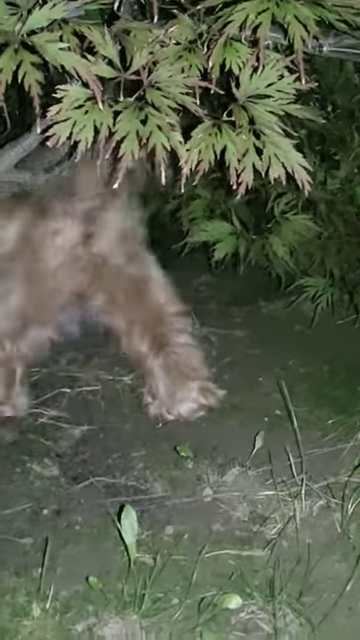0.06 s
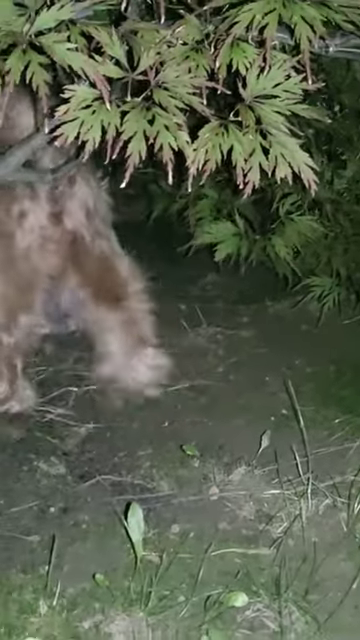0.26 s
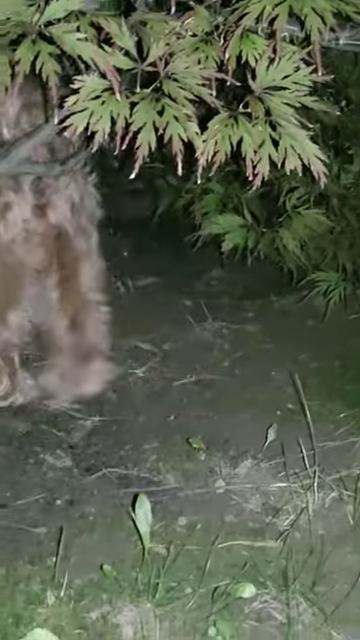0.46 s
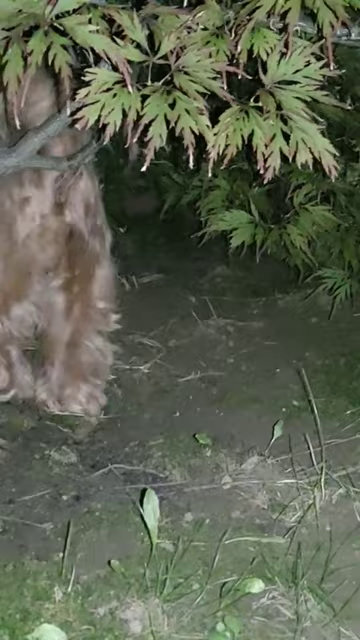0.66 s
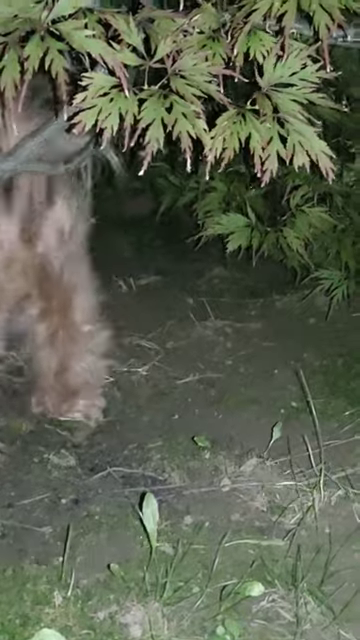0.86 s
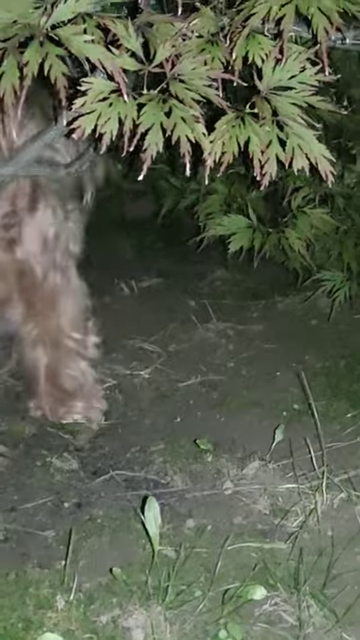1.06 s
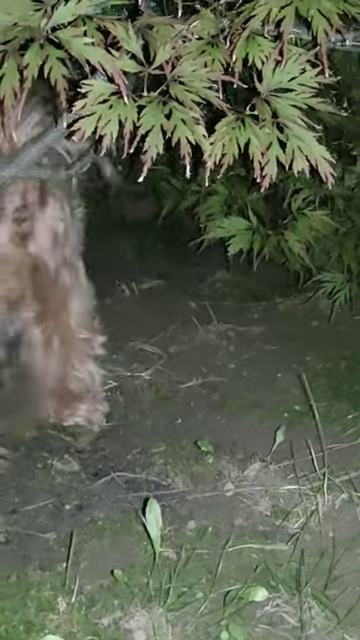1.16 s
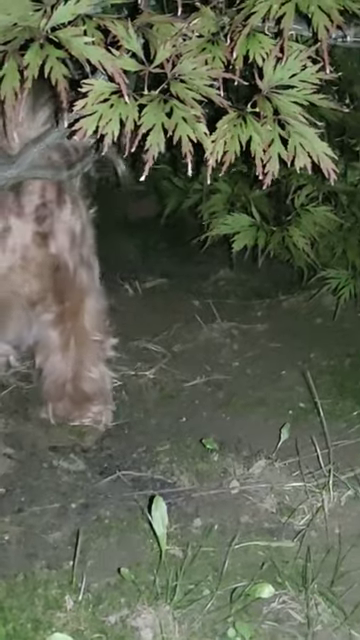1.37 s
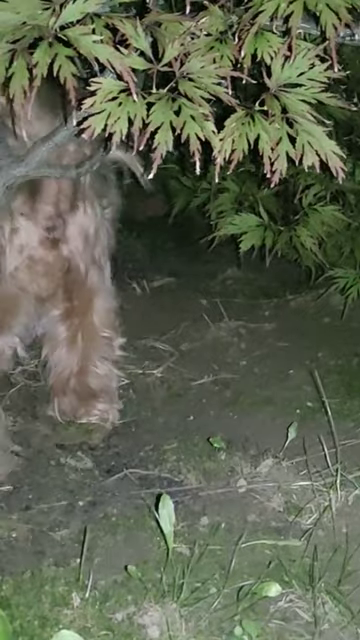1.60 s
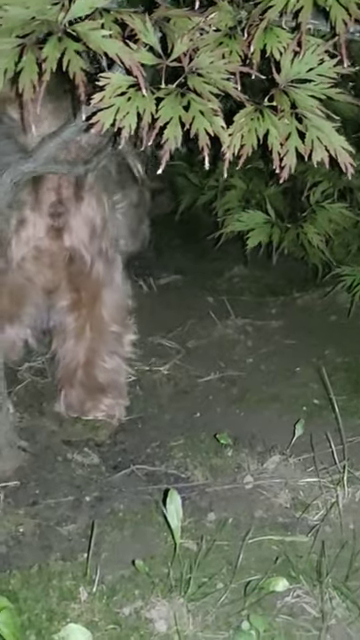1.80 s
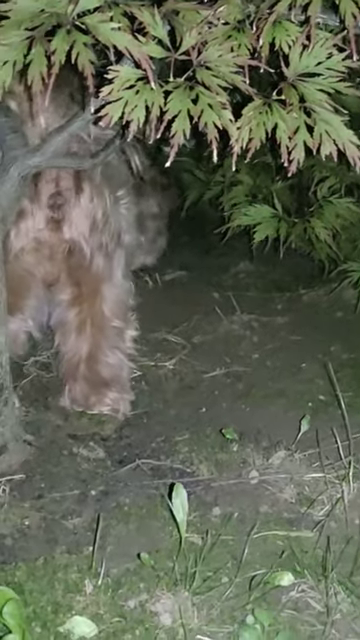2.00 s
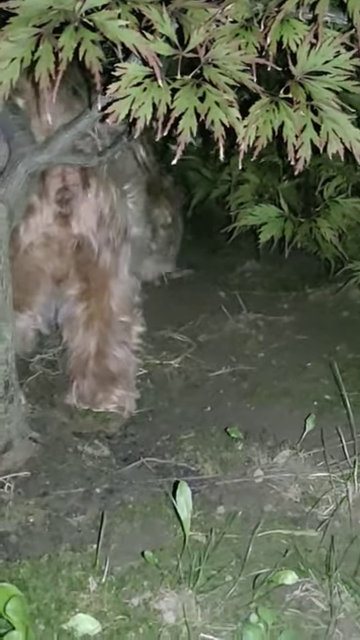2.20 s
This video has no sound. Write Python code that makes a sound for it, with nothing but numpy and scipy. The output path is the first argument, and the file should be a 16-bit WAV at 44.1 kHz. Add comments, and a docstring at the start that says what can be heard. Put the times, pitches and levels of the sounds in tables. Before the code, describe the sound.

Quiet garden at night in close stereo: faint rapid cricket rasping, soft rumble and leaf ticks, then two sharp raspy barks from a nearby small dog, with brief reflections off ground, fence and shrubs.

```python
"""Quiet garden at night, two microphone ports, a small dog a few steps away.
From the start a bush cricket rasps in bursts of noise over a far rumble and thin hiss; leaves tick as decaying noise.
At 1.0 s and 1.7 s the dog barks: hoarse noisy folds, a yelp of gliding tones with a second tone above,
then a low grunt of slack folds. Ground, fence, house and shrubs throw it back as echoes and scatter.
Rumble and cricket carry on to the end, with one late tick."""
import sys
import numpy as np
from scipy import signal
from scipy.fft import rfft, irfft
from scipy.io import wavfile
from scipy.ndimage import uniform_filter1d

SR = 44100
rng = np.random.default_rng(int(sys.argv[2]) if len(sys.argv) > 2 else 0)


def bounce(signal):
    """Save signal as a 16-bit WAV file at the path given by the first command-line argument."""
    frames = np.transpose(np.atleast_2d(signal))
    limited = np.clip(frames, -1, 1)
    pcm = np.round(limited * 32767).astype(np.int16)
    wavfile.write(sys.argv[1], SR, pcm)


N = 99092
TIME = np.arange(N) / SR  # t/s

# Course of each bark: t/s, pitch f/Hz, then level/dB of fundamental, hoarse throat and rasp
BARKS = [
    [(.999, 400.3, -53, -39, -59), (1.011, 467.5, -50.5, -24, -34.5), (1.024, 560.1, -37.5, -16, -32.5),
     (1.039, 630, -36, -17, -31), (1.052, 707.4, -28, -22.5, -29.5), (1.085, 752.4, -22, -29.5, -30.5),
     (1.125, 742.1, -20.5, -34.5, -30.5), (1.158, 687.6, -26.5, -26.5, -30),
     (1.176, 535.3, -32.5, -36, -49), (1.2, 333.5, -40, -42.5, -55.5), (1.235, 230.4, -57, -55.5, -58.5)],
    [(1.671, 392.5, -46, -47, -65.5), (1.683, 471.8, -40, -31, -43.5), (1.702, 599, -31, -15.5, -31),
     (1.721, 654.4, -40.5, -35, -33.5), (1.75, 726.3, -27, -25, -32), (1.785, 787.5, -20.5, -29, -28),
     (1.805, 874, -17, -45, -39), (1.821, 879.4, -19, -44, -39), (1.83, 747, -32, -43.5, -52.5),
     (1.853, 586, -43, -52.5, -55), (1.875, 371, -47.5, -74, -79)],
]
# Second tone of each bark: t/s, f/Hz, level/dB
SECOND_TONES = [
    [(1.018, 1065, -35), (1.039, 1259, -11.5), (1.052, 1136, -18), (1.076, 1068, -13), (1.088, 1023, -26),
     (1.118, 1088, -39.5), (1.136, 1096, -23), (1.148, 1084, -32), (1.155, 921, -23), (1.205, 866, -40.5)],
    [(1.7, 1092, -38.5), (1.72, 1099, -11), (1.744, 1084, -19), (1.753, 1055, -18.5), (1.777, 1088, -21),
     (1.8, 1056, -50.5)],
]
# Where each bark rings clearest: t/s, half width to 1/e t/s, second harmonic level/dB
CLEAREST = [(1.1, 0.017, -31), (1.786, .012, -42)]
# Colour of the hoarse throat, and of the rasp at the open mouth: f/Hz, relative level/dB
THROAT_COLOUR = [(140, -49.5), (235, -19), (650, -15), (870, -5), (1150, 4), (1320, -5.5), (1500, -10.5),
                 (1800, -16), (5000, -66)]
RASP_COLOUR = [(500, -34.5), (1100, -11.5), (1480, 5), (1700, -4), (1950, 1.5), (2400, -2), (3000, -3),
               (5200, -19.5), (5900, -32), (6500, -20), (8200, -23.5), (9600, -27.5), (13300, -31.5),
               (15000, -43)]
# Grunt as the throat closes after each bark: start t/s, length t/s, starting pitch f/Hz, level/dB
GRUNTS = [(1.192, 0.11, 186.5, -37.5), (1.861, .055, 146.3, -52.5)]
# Colour of the grunt: f/Hz, relative level/dB
GRUNT_COLOUR = [(70, -19.5), (150, 3), (260, -7.5), (450, -12), (850, -16), (1400, -34), (8000, -72.5)]
# Between the microphone ports: f/Hz, left minus right level/dB
PORT_BALANCE = [(1150, 0.14), (1750, 7.5), (3100, -6.5), (5000, -6), (6500, -3.5), (8300, 12), (9600, 2),
                (11500, 1.5)]
# Between the microphone ports: f/Hz, lead of the left phase/rad
PORT_LEAD = [(400, 0), (1500, 0.36), (2200, 1.68), (4000, 0.91), (4800, 1.5), (11000, 2)]
# Reflections off ground, fence and house: delay t/s, level/dB, extra delay at the right port t/s
ECHOES = [(.0045, -10.5, .0002), (.0125, -25, -.0002), (.028, -16.5, .0001), (.066, -23.5, -.0001)]
# Decay of the scatter from the shrubs, and of the far tail of the garden: f/Hz, fall by 60 dB t/s
SHRUB_DECAY = [(150, 0.18), (3000, .34), (13000, 0.33)]
FAR_DECAY = [(150, 0.59), (900, 1), (3000, 0.6), (10000, 0.9)]
# Colour of the shrub scatter, and of the far tail: f/Hz, level/dB
SHRUB_COLOUR = [(900, -12), (2500, -7), (9000, -10.5)]
FAR_COLOUR = [(750, -35), (1150, -44), (2600, -18), (6000, -35)]
# Left-right likeness of the scatter: f/Hz, likeness/1
TAIL_LIKENESS = [(300, 0.48), (900, 1), (2500, 0.091)]
# Ticks of leaves and twigs: t/s, level before rise and decay level/dB, centre f/Hz, decay to 1/e t/s
TICKS = [(0.214, -61, 3600, .022), (.68, -71, 3040, .03), (.965, -55.5, 1130, .02),
         (2.139, -57, 1300, .012)]
# Wing strokes of each cricket chirp, the last a broad smear: delay t/s, width t/s, relative level/dB
STROKES = [(.003, 0.0051, 1), (0.03, 0.0055, 0), (.05, .006, -7), (0.027, .035, -2)]
# Colour of the cricket's scratch: f/Hz, relative level/dB
CRICKET_COLOUR = [(7500, -36.5), (8700, -5.5), (9900, -1), (10700, -8.5), (13000, -23)]
# Colour of the night air: f/Hz, relative level per Hz level/dB
AIR_COLOUR = [(28, -42.5), (48, -12), (68, 1.5), (88, -10.5), (220, -16), (500, -28), (1000, -33.5),
              (2200, -37.5), (7000, -45), (12000, -48.5), (15000, -54.5)]
# Left-right likeness of the night air: f/Hz, likeness/1
AIR_LIKENESS = [(300, 0.93), (1000, .6), (2500, 0.034)]

# Unsteady pitch of the dog: share of the pitch (rms), fastest change in Hz
JITTER, JITTER_HZ = 0.0079, 222
STEADY_PITCH_HZ = 743  # JITTER holds here; the folds are more unsteady below, steadier above
CLEAR_CALM = 1  # share of the jitter lost at the clearest moment
OVERTONE_DB_PER_OCTAVE = -13
TONE_WANDER, TONE_FLUTTER, TONE_FLUTTER_HZ = 0.022, .22, 98  # shares of pitch and of amplitude (rms)
# Amplitude of the lines halfway between harmonics, and noise share of the power
THROAT_HALF_LINES, THROAT_NOISE = 0.83, .3
RASP_HALF_LINES, RASP_NOISE = 1, .3
GRUNT_HALF_LINES, GRUNT_NOISE = 0, .7
GRUNT_SAG, GRUNT_JITTER = .3, .08  # shares of the pitch
PUFF_DECAY = 0.27  # share of two fold cycles
EDGE_S = 0.0022  # the breath opens and closes over this time
TICK_OCTAVES, TICK_RISE_S = 0.45, 0.0088  # half width of the band, rise time
FIRST_CHIRP_S, CHIRPS_PER_S = 0.0085, 9.72
CHIRP_SCATTER_S, CHIRP_SCATTER_DB = 0.002, 2.1
CRICKET_LEFT_DB, CRICKET_RIGHT_DB, CRICKET_FADE_DB_PER_S = -66, -70.5, -0.74
AIR_DB = -55.5
BASS_DRIFT_DB, BASS_DRIFT_HZ = 0.1, 3.9  # too slight to hear
BAND_LIMIT_HZ = 15200


def bark(rows, tone_rows, clearest):
    """A gliding fundamental with brief overtones, a second tone, a hoarse throat and a bright rasp."""
    s, *columns = np.transpose(rows)
    during = (TIME >= s[0]) & (TIME <= s[-1])
    t = TIME[during]
    pitch, voice_db, throat_db, rasp_db = (np.interp(t, s, c) for c in columns)
    clear_s, clear_width, overtone_db = clearest
    clear = np.exp(-((t - clear_s) / clear_width) ** 2)

    jitter = JITTER * (STEADY_PITCH_HZ / pitch) ** 3 * (1 - CLEAR_CALM * clear)
    turns = np.cumsum(pitch * (1 + jitter * wander(JITTER_HZ)[during])) / SR
    voice = cosine(turns)
    overtones = sum(amp(OVERTONE_DB_PER_OCTAVE * np.log2(k / 2)) * cosine(k * turns) for k in range(2, 5))

    throat_source = folds(turns, pitch, THROAT_HALF_LINES, THROAT_NOISE)
    throat = steadied(colour(throat_source, THROAT_COLOUR))
    rasp_source = folds(turns, pitch, RASP_HALF_LINES, RASP_NOISE)
    rasp = steadied(colour(rasp_source, RASP_COLOUR))

    mouth = amp(voice_db) * voice + amp(overtone_db) * clear * overtones
    mouth += second_tone(tone_rows, during)
    mouth += amp(throat_db) * throat + amp(rasp_db) * rasp
    out = np.zeros(N)
    out[during] = gate(t, s) * mouth
    return out


def second_tone(rows, during):
    """A tone with its own pitch track, unsteady in pitch and fluttering in level."""
    t = TIME[during]
    s, hz, db = np.transpose(rows)
    pitch = np.interp(t, s, hz) * (1 + TONE_WANDER * wander(JITTER_HZ)[during])
    tone = cosine(np.cumsum(pitch) / SR) * amp(np.interp(t, s, db)) * gate(t, s)
    return tone * (1 + TONE_FLUTTER * wander(TONE_FLUTTER_HZ)[during])


def grunt(start, length, top_hz, db):
    """Slack folds flutter slowly and unevenly behind a closing mouth."""
    during = (TIME >= start) & (TIME < start + length)
    progress = (TIME[during] - start) / length
    pitch = top_hz * (1 - GRUNT_SAG * progress) * (1 + GRUNT_JITTER * wander(JITTER_HZ)[during])
    source = folds(np.cumsum(pitch) / SR, pitch, GRUNT_HALF_LINES, GRUNT_NOISE)
    out = np.zeros(N)
    out[during] = amp(db) * np.sin(np.pi * progress) * steadied(colour(source, GRUNT_COLOUR))
    return out


def folds(turns, pitch, half, noise, count=26):
    """Vocal folds: harmonics, lines halfway between them, and a puff of air every second cycle."""
    k = np.arange(1, count + 1)[:, None]  # multiples of half the pitch
    lines = (np.where(k % 2, half, 1) * np.cos(np.pi * k * turns)).sum(0)
    pulses = lines * np.sqrt(2 * pitch / SR / (1 + half ** 2)) * np.sqrt(2)
    puff_shape = unit(0.16 + np.exp(-(turns / 2 % 1) / PUFF_DECAY))
    puffs = puff_shape * rng.standard_normal(len(turns))
    return np.sqrt(1 - noise) * pulses + np.sqrt(noise) * puffs


def gate(t, times):
    """Breath that opens softly at the first time and closes at the last."""
    return np.clip(np.minimum(t - times[0], times[-1] - t) / EDGE_S, 0, 1)


def garden(x):
    """The direct sound, a few single reflections, scatter from shrubs and a faint far tail."""
    direct = ports(x)
    out = direct.copy()
    for delay, db, extra in ECHOES:
        for port, late in enumerate((delay, delay + extra)):
            out[port] += amp(db) * np.pad(direct[port], (round(late * SR), 0))[:N]
    shrubs = colour(tail(SHRUB_DECAY, build_s=0.0043), SHRUB_COLOUR)
    far = colour(tail(FAR_DECAY, build_s=0.07), FAR_COLOUR)
    return out + signal.fftconvolve(x[None], shrubs + far, axes=1)[:, :N]


def ports(x):
    """Level and phase differences between the two microphone ports, half given to each."""
    hz = bins(x)
    lean = amp(read(PORT_BALANCE, hz) / 2) * np.exp(.5j * read(PORT_LEAD, hz))
    return irfft(rfft(x) * np.array([lean, 1 / lean]), N)


def tail(t60s, build_s):
    """Dense scatter that builds up and dies at its own speed in each band."""
    noise = pair(rng.standard_normal((2, SR)), TAIL_LIKENESS)
    hz, t, z = signal.stft(noise, SR, nperseg=256)
    decay = amp(-60 * t / read(t60s, hz)[:, None])
    taps = signal.istft(z * decay, SR, nperseg=256)[1]
    taps = taps * np.minimum(np.arange(taps.shape[1]) / SR / build_s, 1)
    return taps / np.linalg.norm(taps[0])


def leaves():
    """Faint ticks: short bands of noise that rise quickly and die away."""
    out = np.zeros((2, N))
    for s, db, hz, decay in TICKS:
        t = np.maximum(TIME - s, 0)
        band = 1 / (1 + (np.log2((bins(TIME) + 1) / hz) / TICK_OCTAVES) ** 2)
        rustle = unit(irfft(rfft(rng.standard_normal((2, N))) * band, N))
        out += amp(db) * np.minimum(t / TICK_RISE_S, 1) * np.exp(-t / decay) * rustle
    return out


def cricket():
    """Regular chirps of three scratchy wing strokes, smeared by the foliage."""
    power = np.zeros(N)
    for start in np.arange(FIRST_CHIRP_S, N / SR, 1 / CHIRPS_PER_S):
        for delay, width, db in STROKES:
            late, louder = rng.standard_normal(2)
            t = TIME - start - delay - CHIRP_SCATTER_S * late
            stroke = np.exp(-np.minimum((t / width) ** 2, 20))
            power += amp(db + CHIRP_SCATTER_DB * louder) ** 2 * stroke
    scratch = unit(colour(rng.standard_normal((2, N)), CRICKET_COLOUR))
    level = amp([[CRICKET_LEFT_DB], [CRICKET_RIGHT_DB]]) * amp(CRICKET_FADE_DB_PER_S * TIME)
    return scratch * np.sqrt(power) * level


def air():
    """Steady far rumble and a thin hiss as shaped noise."""
    noise = pair(rng.standard_normal((2, N)), AIR_LIKENESS)
    bed = unit(irfft(rfft(noise) * amp(read(AIR_COLOUR, bins(noise))), N))
    bass = irfft(rfft(bed) * np.exp(-(bins(bed) / 400) ** 2), N)
    bass_gain = amp(BASS_DRIFT_DB * wander(BASS_DRIFT_HZ))
    return amp(AIR_DB) * (bed + bass * (bass_gain - 1))


def amp(db):
    """Amplitude factor of a level in dB."""
    return 10 ** (np.asarray(db) / 20)


def unit(x):
    """Scales a sound to rms 1."""
    return x / np.sqrt(np.mean(x ** 2) + 1e-20)


def steadied(x, size=500):
    """Holds a sound at rms 1 from moment to moment, over a window in samples."""
    return x / np.sqrt(abs(uniform_filter1d(x ** 2, size)) + 1e-12)


def cosine(turns):
    """A pure tone of rms 1 from its phase in turns."""
    return np.sqrt(2) * np.cos(2 * np.pi * turns)


def wander(rate_hz):
    """Smooth random motion of rms 1, with little above the given rate."""
    return unit(irfft(rfft(rng.standard_normal(N)) * np.exp(-(bins(TIME) / rate_hz) ** 2), N))


def bins(x):
    """Frequencies of the spectrum of x in Hz."""
    return np.fft.rfftfreq(x.shape[-1], 1 / SR)


def read(points, hz):
    """A table's value, interpolated on a log-frequency axis."""
    f, value = np.transpose(points)
    return np.interp(np.log(hz + 1), np.log(f + 1), value)


def colour(x, points):
    """Causal minimum-phase filter with the given f/Hz, level/dB response."""
    log_gain = np.log(amp(read(points, abs(np.fft.fftfreq(4096, 1 / SR)))))
    taps = np.fft.ifft(np.exp(np.conj(signal.hilbert(log_gain)))).real
    taps = taps[:len(taps) // 2]
    return np.apply_along_axis(lambda v: signal.fftconvolve(v, taps)[:len(v)], -1, x)


def pair(x, likeness):
    """Makes two unrelated channels alike by a share that depends on frequency."""
    a, b = rfft(x)
    same = np.clip(read(likeness, bins(x)), -1, 1)
    return irfft(np.array([a, same * a + np.sqrt(1 - same ** 2) * b]), x.shape[-1])


def scene():
    """The dog heard through the garden, over leaves, cricket and night air."""
    dog = sum(bark(*tables) for tables in zip(BARKS, SECOND_TONES, CLEAREST))
    dog = dog + sum(grunt(*row) for row in GRUNTS)
    return garden(dog) + leaves() + cricket() + air()


def record(dry):
    """The recorder's band limit, a steep low-pass."""
    taps = signal.firwin(511, BAND_LIMIT_HZ, window=("kaiser", 9), fs=SR)
    return signal.oaconvolve(dry, taps[None], "same")


dry = scene()
out = record(dry)
bounce(out)
```